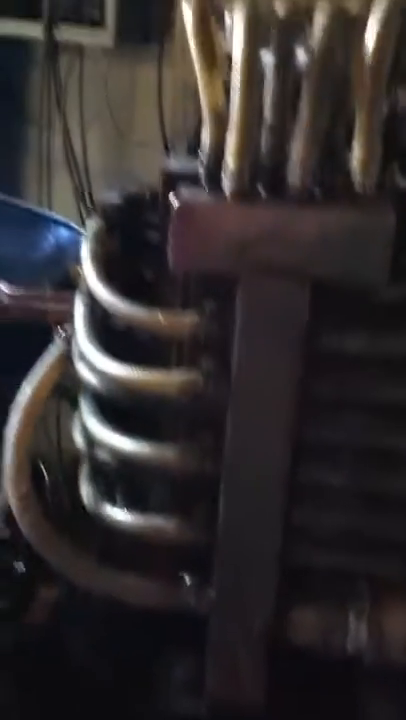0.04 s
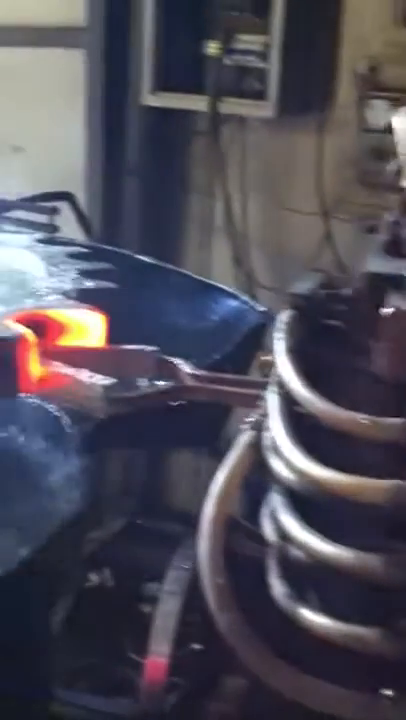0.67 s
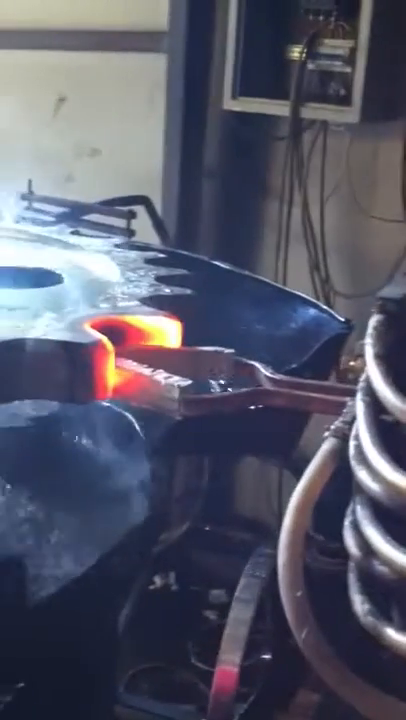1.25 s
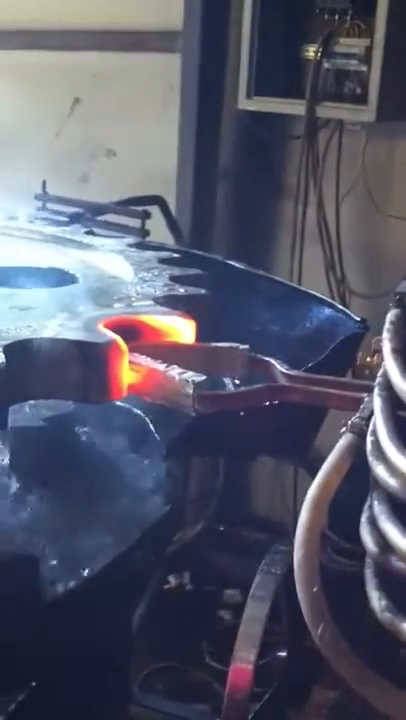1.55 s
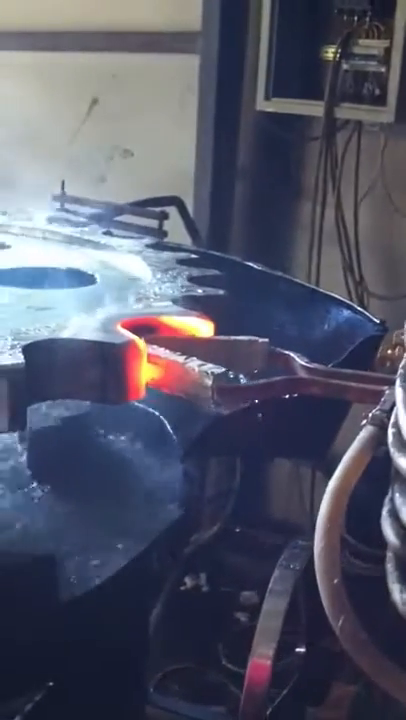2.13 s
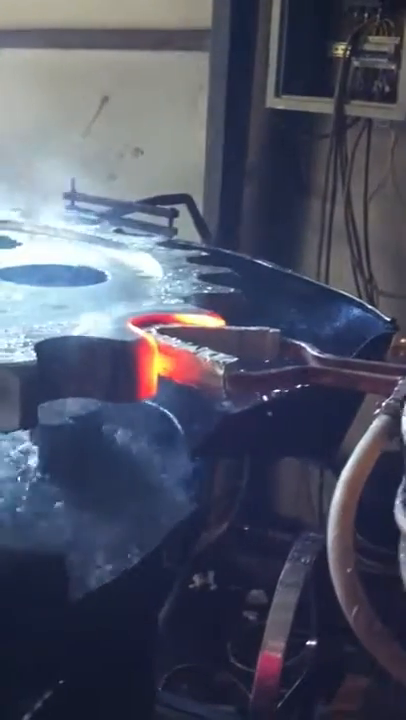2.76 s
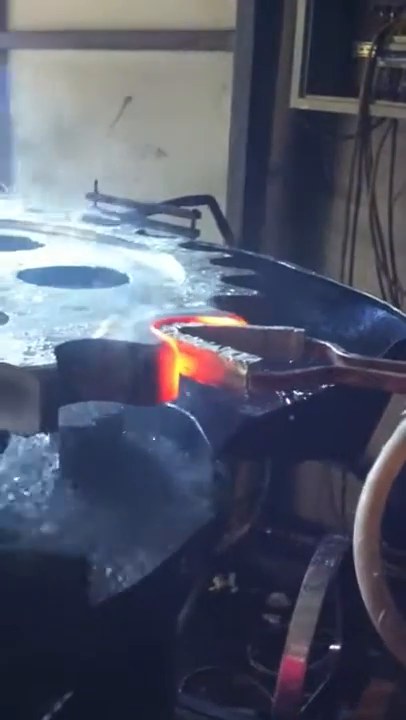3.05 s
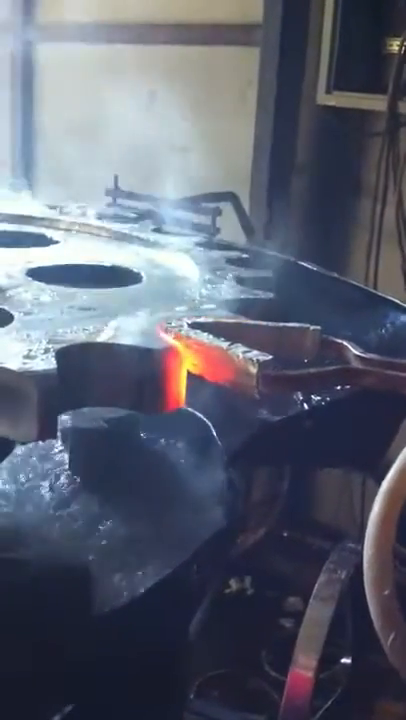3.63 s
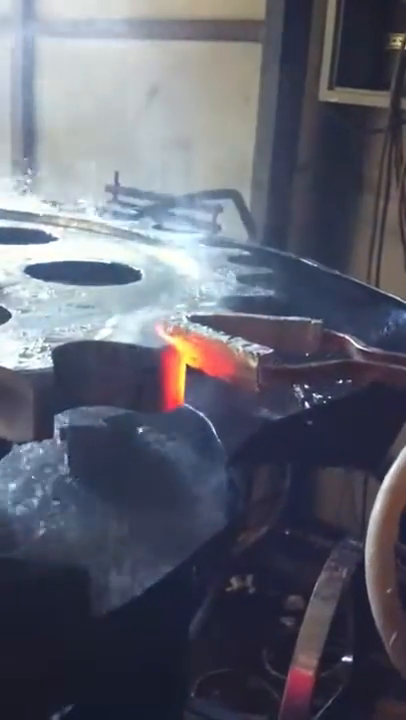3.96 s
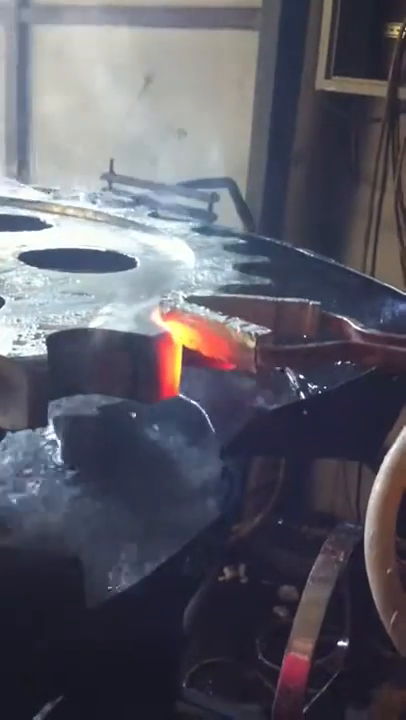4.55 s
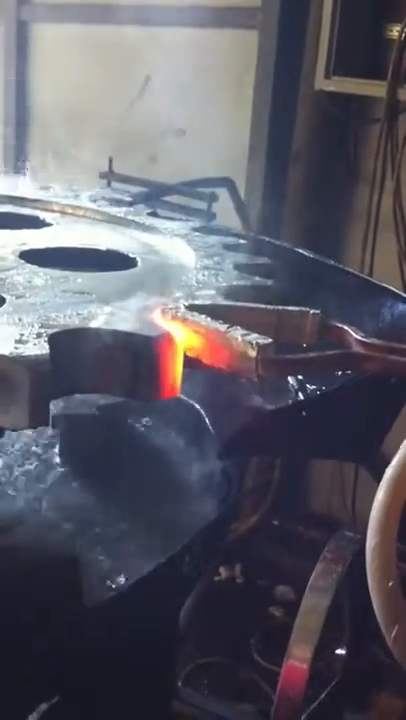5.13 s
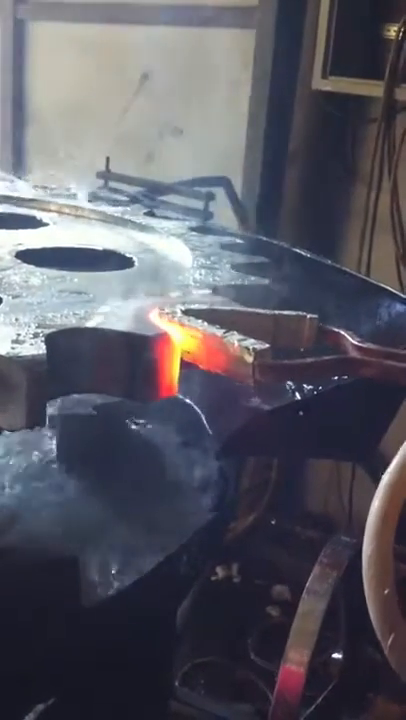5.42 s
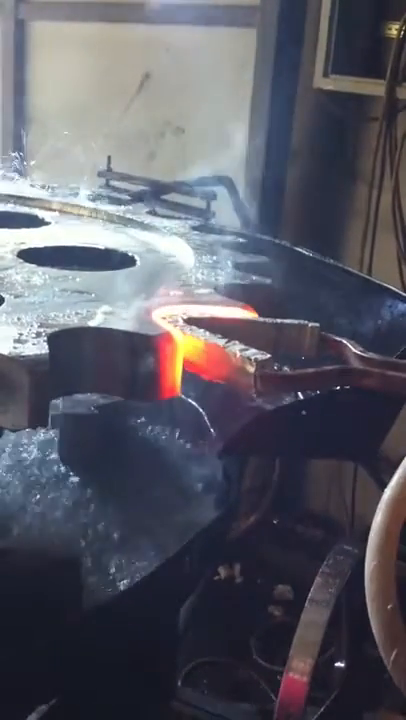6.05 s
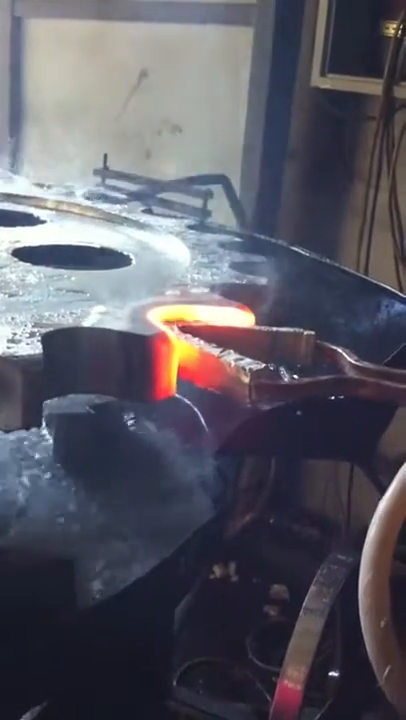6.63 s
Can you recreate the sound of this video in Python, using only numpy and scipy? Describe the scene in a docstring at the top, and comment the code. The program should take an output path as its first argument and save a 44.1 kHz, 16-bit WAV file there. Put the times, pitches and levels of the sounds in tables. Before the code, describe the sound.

A piercing electronic whine swells and fades above running water on steel and droning motors, while something heavy thumps twice further off.

```python
"""In a workshop, an induction coil heats a tooth of a large steel sprocket while coolant runs over it.
The inverter's current shakes the metal near 6 kHz and, louder, an octave up; both tones swell and
fade as the microphone moves through their standing waves. Motors and a pump hum and whir over the
shop's roar, a turning part squeaks faintly, and splashing water keeps the steel ringing.
Twice something heavy thumps further off."""
import sys
import numpy as np
from scipy import signal
from scipy.fft import rfft, irfft, next_fast_len
from scipy.io import wavfile

SR = 44100
rng = np.random.default_rng(int(sys.argv[2]) if len(sys.argv) > 2 else 0)


def digitize_waveform(pressure):
    """Quantize a signal to 16-bit integers and store it at the path in sys.argv[1].

    Rows of a 2-D input are taken as channels; values are limited to [-1, 1].
    """
    field = np.atleast_2d(pressure).T
    bounded = np.clip(field, -1, 1)
    quanta = np.round(bounded * 32767).astype(np.int16)
    wavfile.write(sys.argv[1], SR, quanta)


N = 299439
TIME = np.arange(N) / SR


def gain_of(db):
    """Decibels to amplitude."""
    return 10 ** (np.asarray(db) / 20)


def unit_rms(x):
    """Scales x to an rms of one."""
    return x / np.sqrt(np.mean(x ** 2) + 1e-20)


def spectrum_db(spectrum, hz):
    """A spectrum table interpolated on a log-frequency axis."""
    table_hz, db = np.transpose(spectrum)
    return np.interp(np.log(hz + 1), np.log(table_hz), db)


def curves(rows):
    """Each value column of a time table at every sample."""
    times, *columns = np.transpose(rows)
    return [np.interp(TIME, times, column) for column in columns]


def coloured(x, spectrum):
    """x filtered by a spectrum table, at unit rms."""
    hz = np.fft.rfftfreq(len(x), 1 / SR)
    return unit_rms(irfft(rfft(x) * gain_of(spectrum_db(spectrum, hz)), len(x)))


def noise(spectrum, samples=N):
    """Coloured noise, unit rms."""
    return coloured(rng.standard_normal(samples), spectrum)


def wander(rate_hz):
    """Random motion of unit rms, rolling off above rate_hz."""
    size = next_fast_len(N)
    hz = np.fft.rfftfreq(size, 1 / SR)
    bins = rfft(rng.standard_normal(size)) / (1 + (hz / rate_hz) ** 2)
    return unit_rms(irfft(bins, size)[:N])


def halo(phase, width_hz):
    """Narrow noise band that follows a tone."""
    return wander(width_hz) * np.cos(phase) + wander(width_hz) * np.sin(phase)


def add(mix, start_s, sound):
    """Mixes a sound in at start_s."""
    part = mix[round(start_s * SR):][:len(sound)]
    part += sound[:len(part)]


# inverter pitch, following the resonance of coil and heating steel: t/s, f/Hz
INVERTER_PITCH = [(0, 5999), (.45, 6005), (1.1, 6013), (1.9, 6014), (2.7, 6009), (3.15, 6011.5),
                  (3.55, 6021.5), (4.2, 6029.5), (4.45, 6028), (4.72, 6024.5), (5.1, 6031), (5.35, 6031.5),
                  (5.7, 6027), (6.25, 6014), (6.79, 6009.5)]
# fundamental's standing waves along the microphone's path: t/s, level/dB before trim
FUNDAMENTAL_LEVEL = [(0, -27), (.1, -26.5), (.21, -23), (.38, -22), (.54, -36), (.62, -34), (.78, -28.5),
                     (.95, -27.5), (1.11, -36.5), (1.25, -29.5), (2.3, -26), (2.68, -29), (3.14, -27),
                     (3.23, -36), (3.31, -38), (3.5, -31.5), (3.57, -25.5), (4.6, -25), (5.0, -28),
                     (5.25, -33), (5.54, -25.5), (5.88, -23), (6.1, -26.5), (6.79, -32)]
# octave's standing waves: t/s, level/dB before trim
OCTAVE_LEVEL = [(0, -17), (.07, -16.5), (.155, -36), (.2, -26.5), (.34, -17), (.44, -22), (.55, -14),
                (.78, -20.5), (.845, -34), (.92, -21.5), (1.0, -21), (1.25, -27), (1.48, -25), (1.7, -21),
                (2.1, -22), (2.28, -22.5), (2.4, -20.5), (2.64, -18.7), (2.82, -24.5), (2.89, -30),
                (2.94, -25), (2.975, -42), (3.01, -29.5), (3.11, -31), (3.165, -32), (3.2, -25.5),
                (3.29, -17.5), (3.37, -22), (3.5, -21.5), (3.55, -27), (3.6, -21.5), (3.78, -21),
                (3.83, -23.5), (3.93, -19.5), (3.99, -34), (4.04, -19.5), (4.19, -27), (4.29, -18),
                (4.39, -22), (4.53, -14.5), (4.62, -18.5), (4.72, -14), (4.82, -17), (4.95, -13.5),
                (5.09, -20), (5.22, -16.5), (5.39, -15), (5.98, -19), (6.22, -20.5), (6.29, -23),
                (6.34, -19), (6.46, -28), (6.66, -28), (6.79, -36)]
# supply-ripple sidebands: offset/Hz, level at octave/dB, level at fundamental/dB
SIDEBANDS = [(-623, -57, -66), (-415, -50, -70), (-300, -60, -62), (-207.6, -50, -68), (207.6, -49, -66),
             (299, -52, -61.5), (414, -59, -62), (625, -57, -73)]


def inverter(low_trim_db=0.82, high_trim_db=0.6, sway_hz=11, fading_db=5.5, fading_hz=2.5,
             low_halo_db=-47, high_halo_db=-37.5, halo_hz=50):
    """Coil current shakes the metal at its own frequency, magnetic force at twice that."""
    phase = 2 * np.pi * np.cumsum(curves(INVERTER_PITCH)[0]) / SR
    # small hand movements sway both tones
    low_db = curves(FUNDAMENTAL_LEVEL)[0] + low_trim_db + 0.6 * wander(sway_hz)
    high_db = curves(OCTAVE_LEVEL)[0] + high_trim_db + 0.63 * wander(sway_hz)
    tones = gain_of(low_db) * np.sin(phase) + gain_of(high_db) * np.sin(2 * phase)
    for offset_hz, octave_db, fundamental_db in SIDEBANDS:
        beat = 2 * np.pi * (offset_hz * TIME + rng.random()) + wander(rate_hz=2)
        high_side = gain_of(octave_db) * np.sin(2 * phase + beat)
        low_side = gain_of(fundamental_db) * np.sin(phase + beat)
        tones += gain_of(fading_db * wander(fading_hz)) * (high_side + low_side)
    # steam and moving water scatter each tone
    scatter = gain_of(low_halo_db) * halo(phase, halo_hz)
    scatter += gain_of(high_halo_db) * halo(2 * phase, halo_hz)
    return np.sqrt(2) * tones + scatter


def machine_tones(lines, waver, rate_hz):
    """Steady tones, each wavering in strength and phase in the room."""
    out = np.zeros(N)
    for hz, db in lines:
        phase = 2 * np.pi * (hz * TIME + rng.random())
        out += gain_of(db) * unit_rms(np.sin(phase) + waver * halo(phase, rate_hz))
    return out


# lower motor group: f/Hz, relative level/dB
LOW_DRONE_TONES = [(228.5, -49), (244.5, -41), (247.6, -49), (268.8, -49.5)]
# upper motor group: f/Hz, relative level/dB
HIGH_DRONE_TONES = [(294, -44.5), (298.3, -43), (300.1, -44.5), (323, -49.5), (372, -48.5)]
# drone envelope: t/s, lower gain/dB, upper gain/dB
DRONE_GAIN = [(0, -2.5, -10), (1.3, 2.5, -3), (1.9, 1, -1.5), (2.6, 5, 1.5), (3.4, 0, -0.5), (4.3, 3, 3),
              (5.1, -7, -17), (6.79, -8, -10)]


def drone():
    """Motors at nearly equal speed beat a few times a second, strongest mid-way."""
    low_db, high_db = curves(DRONE_GAIN)
    low = gain_of(low_db) * machine_tones(LOW_DRONE_TONES, waver=0.19, rate_hz=3.2)
    high = gain_of(high_db) * machine_tones(HIGH_DRONE_TONES, waver=0.4, rate_hz=2.7)
    return low + high


# high pump tones: f/Hz, relative level/dB
WHIR_TONES = [(1976, -46.5), (1997, -50), (2089.5, -44.5), (2123, -52), (2138, -52.5), (2159.5, -48),
              (3079, -65), (3107, -58.5), (4050, -53.5), (4086, -59), (4486, -57), (4517, -53), (4603, -55),
              (7919, -62), (8113, -54), (8132, -56)]


def whir(trim_db=-2, sway_db=1.6):
    """The pump's high tones sway slowly in level together."""
    gain = gain_of(trim_db + sway_db * wander(rate_hz=1))
    return gain * machine_tones(WHIR_TONES, waver=0.32, rate_hz=4.3)


# single motor tone: f/Hz, relative level/dB
WHISTLE_TONE = [(2417.5, -49)]
# its envelope: t/s, gain/dB
WHISTLE_GAIN = [(0, -7), (1.5, 0.5), (2.8, 0), (3.6, 1), (4.8, 0), (5.5, -6), (6.79, -10)]


def whistle():
    """One motor tone rises out of the whir, then sinks into the hiss."""
    return gain_of(curves(WHISTLE_GAIN)[0]) * machine_tones(WHISTLE_TONE, waver=0.5, rate_hz=5)


# low mains and pump tones: f/Hz, level/dB
HUM_TONES = [(113.5, -52.5), (137, -51), (575, -51.5), (600, -55), (860, -56.5)]


def hum():
    """Mains and pump hum steadily."""
    return machine_tones(HUM_TONES, waver=0.3, rate_hz=1.3)


# envelope of the shaft overtones: f/Hz, relative level/dB
PUMP_SPECTRUM = [(1200, -16), (1800, 11.5), (2050, 1), (2300, -8), (2900, -6), (3100, 11), (3600, 12),
                 (4600, 5.5), (5100, 9), (6000, -13)]


def pump(shaft_hz=30.24, level_db=-45, uneven_db=3):
    """Each shaft turn repeats the same rasp: a dense comb of uneven overtones."""
    size = next_fast_len(N)
    hz = shaft_hz * np.arange(40, 196)
    overtone_db = spectrum_db(PUMP_SPECTRUM, hz) + uneven_db * rng.standard_normal(len(hz))
    phase = 2 * np.pi * rng.random(len(hz))
    comb = np.zeros(size // 2 + 1, complex)
    comb[np.round(hz * size / SR).astype(int)] = gain_of(overtone_db) * np.exp(1j * phase)
    return gain_of(level_db) * unit_rms(irfft(comb, size)[:N])


# machine roar: f/Hz, relative level/dB
ROAR_SPECTRUM = [(20, -42), (45, -42), (70, -31), (100, -20), (125, -14.5), (165, -6.5), (210, -3),
                 (265, -0.5), (340, -2.2), (470, -7), (620, -7), (850, -12.5), (1500, -17.5), (4000, -52)]


def shop_roar(level_db=-32, swell_db=0.27, swell_hz=0.58, throb_db=1.02, throb_hz=13):
    """The shop's machines, blurred by the hall."""
    db = level_db - swell_db * wander(swell_hz) + throb_db * wander(throb_hz)
    return gain_of(db) * noise(ROAR_SPECTRUM)


# low rumble: f/Hz, relative level/dB
RUMBLE_SPECTRUM = [(90, -39), (135, -3), (175, 3.5), (215, -1), (280, -33)]
# its swells: t/s, level/dB
RUMBLE_SWELLS = [(0, -42), (.7, -53), (4.6, -64), (4.9, -46), (5.3, -63), (5.62, -42), (6.0, -59),
                 (6.55, -38), (6.79, -45)]


def rumble():
    """Low noise fades at the start and returns in three late swells."""
    return gain_of(curves(RUMBLE_SWELLS)[0]) * noise(RUMBLE_SPECTRUM)


# hiss up to about 12.5 kHz; above it the level falls steeply, leaving only a very faint hiss: f/Hz, relative
# level/dB
HISS_SPECTRUM = [(300, -30), (900, 2.5), (1300, -0.3), (1800, 1.6), (2060, 1.5), (2300, 1.7), (2900, 0.5),
                 (3300, -1), (3750, -1), (4200, -0.1), (4700, -1.3), (4970, -2), (5600, -3.5), (6500, -6),
                 (7800, -4.5), (10000, -8), (12400, -7.5), (13000, -42), (15700, -50)]


def coolant(flow_db=-37.5, rush_gain_db=1, drop_gain_db=-4, drops_per_s=1200, spread_db=0.5,
            surge_db=1, surge_hz=20):
    """Water rushes smoothly while many small drops splash on the steel."""
    sizes = gain_of(spread_db * np.minimum(rng.exponential(1, N), 4.5))
    signs = rng.choice([-1, 1], N)
    impacts = sizes * signs * (rng.random(N) < drops_per_s / SR)
    rush = gain_of(rush_gain_db) * noise(HISS_SPECTRUM)
    drops = gain_of(drop_gain_db) * coloured(impacts, HISS_SPECTRUM)
    return gain_of(flow_db + surge_db * wander(surge_hz)) * (rush + drops)


# steel resonances under the spray: f/Hz, width/Hz, level/dB
SPRAY_MODES = [(2750, 48, -54.5), (3097, 48, -50.5), (3290, 51, -54.5), (4330, 90, -55), (4505, 46, -53.5),
               (4800, 49, -53)]


def spray(flare_db=2.5, flare_hz=5):
    """Shifting jets excite one resonance of the steel, then another."""
    return sum(gain_of(db + flare_db * wander(flare_hz)) * halo(2 * np.pi * hz * TIME, width_hz)
               for hz, width_hz, db in SPRAY_MODES)


# ringing metalwork: f/Hz, relative level/dB
RING_SPECTRUM = [(1500, -25), (1880, 2), (1980, 2.5), (2040, 7.5), (2110, -0.5), (2190, -2.5), (2280, -8),
                 (2700, -52)]
# its envelope: t/s, level/dB
RING_ENVELOPE = [(0, -52), (1.4, -46), (4.2, -44.5), (4.9, -42), (6.79, -44)]


def metal_ring():
    """The flow keeps the metalwork ringing, rough and diffuse, louder toward the end."""
    return gain_of(curves(RING_ENVELOPE)[0]) * noise(RING_SPECTRUM)


def squeaks(first_s=0.16, turn_s=1.394, length_s=0.06, level_db=-43.5,
            pitch_hz=5028, fall_hz=75, settle_s=0.016, echo_s=0.033, echo_db=-7):
    """A part rubs once a turn, starting sharp and settling in pitch; a wall reflects it."""
    out, t = np.zeros(N), np.arange(round(length_s * SR)) / SR
    hz = pitch_hz + fall_hz * np.exp(-t / settle_s)
    envelope = gain_of(level_db) * np.sqrt(2) * np.sin(np.pi * t / length_s)
    rub = envelope * np.sin(2 * np.pi * np.cumsum(hz) / SR)
    for start_s in np.arange(first_s, N / SR, turn_s):
        add(out, start_s, rub)
        add(out, start_s + echo_s, gain_of(echo_db) * rub)
    return out


# two runs of blows and dull rebounds: t/s, then gain/dB of boom, clatter, clack, crack
THUMP_BLOWS = [(.7515, -34, -30, -34, -39), (.759, -32, -24, -27, -34), (.7665, -21.5, -31, -28, -32),
               (.7962, -26.5, -38, -35, -39), (.8705, -28.5, -46, -46, -50), (4.732, -30, -23, -30, -35),
               (4.7435, -37, -20.5, -28, -35), (4.7615, -40, -26, -22, -41), (4.7735, -37, -21, -28.5, -41),
               (4.810, -27, -31, -39, -43), (4.891, -30, -39, -46, -50)]
# low modes of the struck body: f/Hz, relative level/dB, t60/s
BOOM_MODES = [(176, -5, 0.23), (236, 3, 0.14), (270.3, 5.5, 0.15), (293.8, 2, 0.23), (460, -10, 0.14),
              (630, -16, 0.14)]
# sheet-metal modes: f/Hz, relative level/dB, t60/s
PANEL_MODES = [(588, 6, 0.29), (660, -1.5, 0.16), (712, 2, .22), (863, 3, 0.18), (1100, 3, 0.22),
               (1300, 2, .12), (1550, -1, 0.21), (1690, -1, 0.17), (1775, -13, .18), (2000, -4, 0.22),
               (2090, -9, .15), (2640, -13, .18), (2760, -10.5, .14), (3040, -14, .16)]
# hollow clatter: f/Hz, relative level/dB
CLATTER_SPECTRUM = [(40, -45), (100, -26), (190, 3.5), (450, 6), (650, -1), (860, -2.5), (1150, -15),
                    (1700, -8), (4500, -28), (8000, -50)]
# clack of hard contact: f/Hz, relative level/dB
CLACK_SPECTRUM = [(500, -32), (1000, -5), (1350, -5), (1700, 1), (2050, -7), (2600, -3.5), (3200, -10),
                  (4500, -10), (8000, -48)]
# crack of an edge catching: f/Hz, relative level/dB
CRACK_SPECTRUM = [(1200, -25), (2100, -1), (3200, 0), (4300, -3), (6500, -22), (9000, -40)]


def thumps(soft_rise_s=0.0021, hard_rise_s=0.00082, clatter_t60_s=0.12, contact_t60_s=0.065,
           panel_db=-9, spread_db=2, tail_db=-19, tail_t60_s=0.5, highpass_hz=125):
    """Each blow cracks, clacks, clatters, rings sheet metal and booms; the hall adds a tail."""
    out, t = np.zeros(N), np.arange(SR) / SR
    tail = gain_of(tail_db - 60 * t / tail_t60_s)

    def burst(spectrum, t60_s):
        """Decaying noise with the hall's tail."""
        return np.hypot(gain_of(-60 * t / t60_s), tail) * noise(spectrum, len(t))

    boom = sum(gain_of(db - 60 * t / t60_s) * np.sin(2 * np.pi * hz * t) for hz, db, t60_s in BOOM_MODES)
    for start_s, boom_db, clatter_db, clack_db, crack_db in THUMP_BLOWS:
        panel = np.zeros(len(t))
        for hz, db, t60_s in PANEL_MODES:
            mode_db = db + spread_db * rng.standard_normal()  # each spot struck favours other modes
            panel += gain_of(mode_db - 60 * t / t60_s) * np.sin(2 * np.pi * (hz * t + rng.random()))
        soft = gain_of(boom_db) * boom + gain_of(clatter_db) * burst(CLATTER_SPECTRUM, clatter_t60_s)
        hard = gain_of(clack_db) * (burst(CLACK_SPECTRUM, contact_t60_s) + gain_of(panel_db) * panel)
        hard += gain_of(crack_db) * burst(CRACK_SPECTRUM, contact_t60_s)
        soft *= 1 - np.exp(-t / soft_rise_s)
        hard *= 1 - np.exp(-t / hard_rise_s)
        add(out, start_s, soft + hard)
    return signal.sosfilt(signal.butter(4, highpass_hz, "highpass", fs=SR, output="sos"), out)


# fuller coolant splash: f/Hz, relative level/dB
SPLASH_SPECTRUM = [(330, -27), (520, 3), (750, 1), (1300, 0), (2000, -21)]
# its envelope: t/s, level/dB
SPLASH_ENVELOPE = [(0, -62), (2.1, -49), (2.85, -41.5), (3.6, -48), (4.4, -59)]


def splash():
    """The coolant briefly splashes with a fuller voice near 3 s."""
    return gain_of(curves(SPLASH_ENVELOPE)[0]) * noise(SPLASH_SPECTRUM)


def scene():
    """All sources at one microphone."""
    machines = drone() + whir() + whistle() + hum() + pump() + squeaks() + shop_roar() + rumble()
    water = coolant() + spray() + metal_ring() + splash()
    return (inverter() + machines + water + thumps())[None]


def record(dry):
    """Steep low-pass at 15.75 kHz."""
    lowpass = signal.firwin(511, 15750, window=("kaiser", 9), fs=SR)
    return signal.oaconvolve(dry, lowpass[None], "same")


dry = scene()
out = record(dry)
digitize_waveform(out)
```